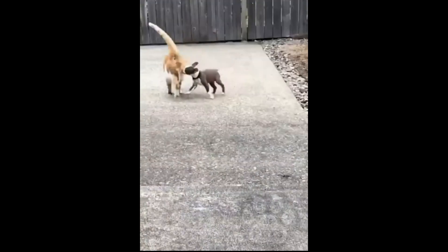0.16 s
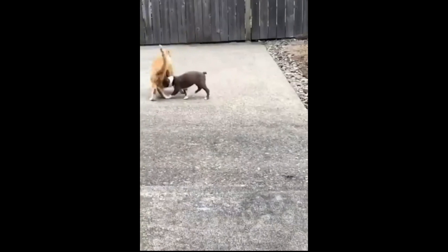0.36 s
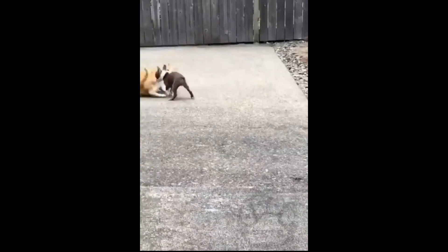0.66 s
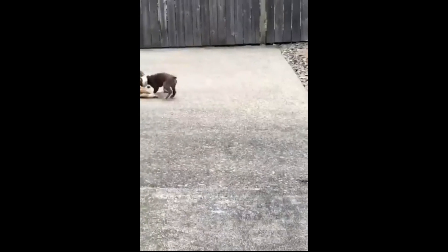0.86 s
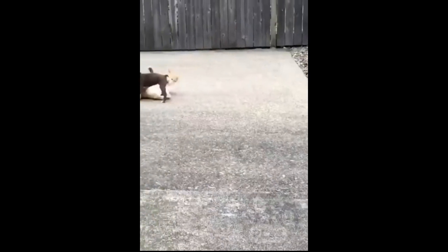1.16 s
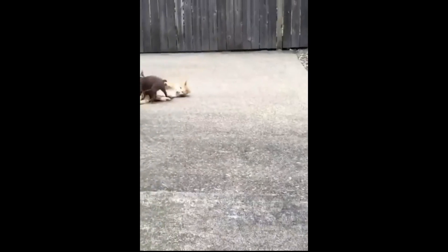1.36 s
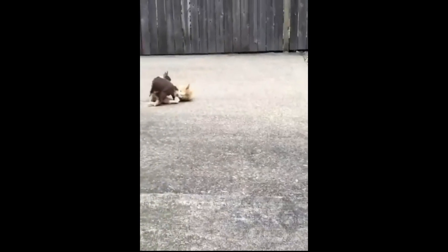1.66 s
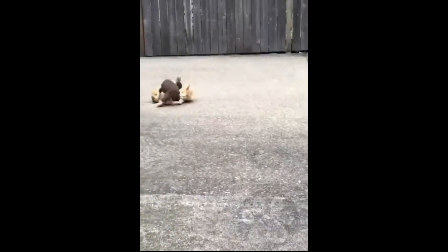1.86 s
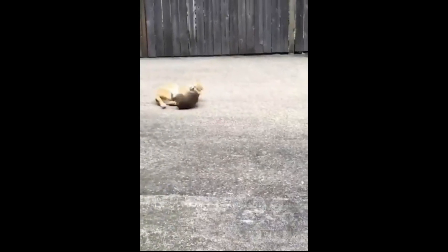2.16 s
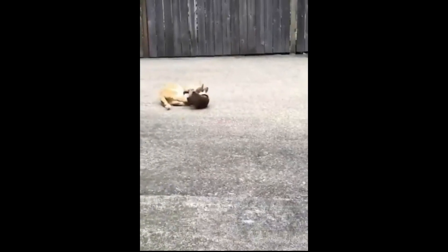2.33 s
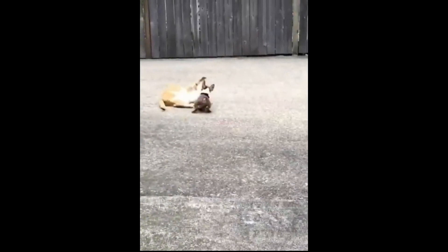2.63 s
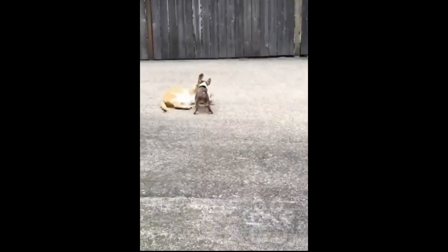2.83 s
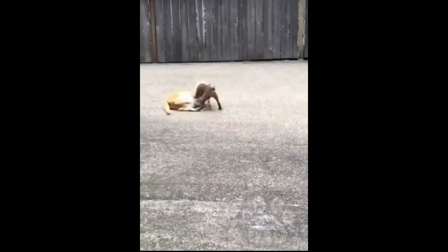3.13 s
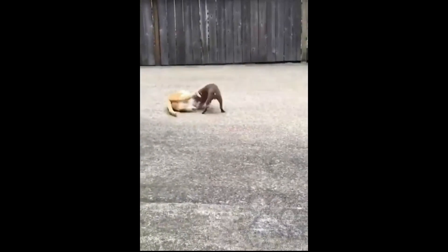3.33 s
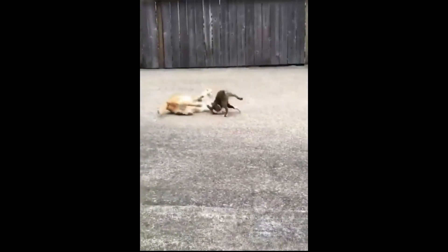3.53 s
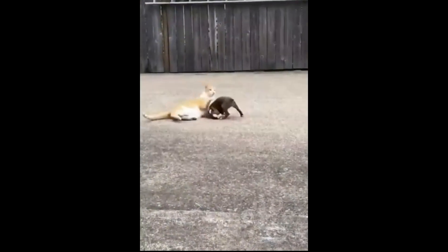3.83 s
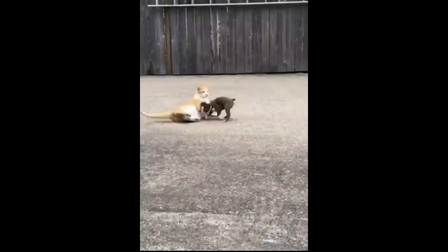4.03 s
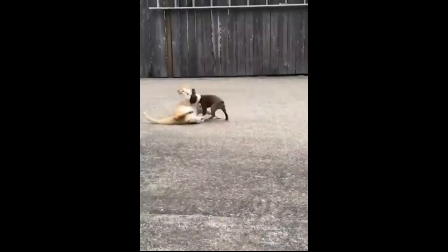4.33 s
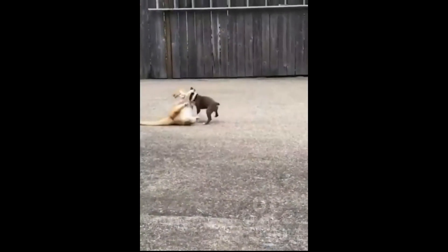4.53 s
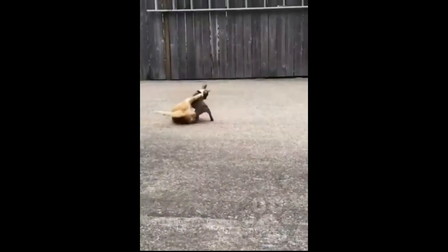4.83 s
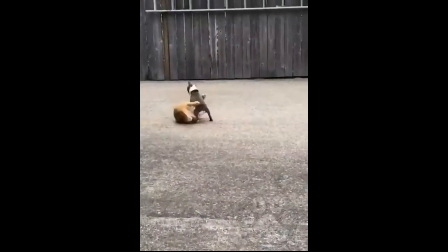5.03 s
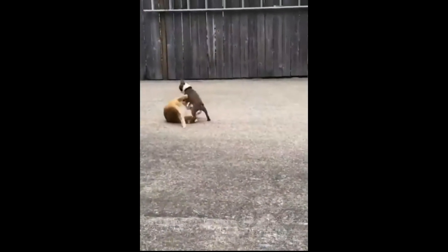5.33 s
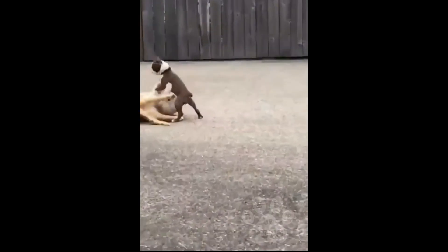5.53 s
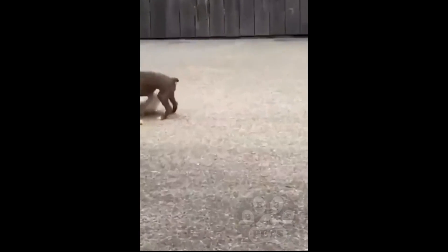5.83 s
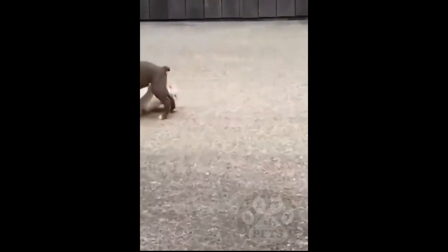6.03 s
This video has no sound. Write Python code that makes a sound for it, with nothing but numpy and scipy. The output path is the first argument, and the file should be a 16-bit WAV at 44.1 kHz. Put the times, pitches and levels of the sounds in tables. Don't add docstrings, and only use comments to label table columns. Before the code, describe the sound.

Two small collar tags clink brightly as a puppy and cat tussle on a concrete driveway. Clusters of thin, high chinks come and go among tiny claw ticks and gritty scuffs. A little past halfway, a very loud double clank rings briefly and is choked off, then lighter muffled jingles follow. Faint town rumble and fan hum stay beneath. Heard from a few metres, with slight fence reflections.

```python
import sys
import numpy as np
from scipy import signal
from scipy.fft import rfft, irfft, next_fast_len
from scipy.io import wavfile
from scipy.ndimage import uniform_filter1d, map_coordinates

SR = 44100
rng = np.random.default_rng(int(sys.argv[2]) if len(sys.argv) > 2 else 0)


def bounce(signal):
    frames = np.transpose(np.atleast_2d(signal))
    limited = np.clip(frames, -1, 1)
    pcm = np.round(limited * 32767).astype(np.int16)
    wavfile.write(sys.argv[1], SR, pcm)


def level_to_linear(level):
    exponent = np.asarray(level, float) / 20
    return 10 ** exponent


N = 272626

# [f/Hz, level/dB]
RUMBLE_SPECTRUM = [(13, -56.5), (24, -27), (56, -2.5), (156, -4.5), (310, -8.5), (395, -15), (480, -27),
                   (1100, -120)]
WASH_SPECTRUM = [(250, -39.5), (450, 1), (800, -2), (1500, -10), (2500, -15), (5000, -17.5), (10000, -23),
                 (16000, -30)]
# [f/Hz, peak level/dB]
FAN_LINES = [(37.1, -61), (75.5, -54), (96, -57), (110.9, -57), (116.8, -57), (120, -52.7), (145.9, -57.5),
             (160.3, -60), (233.5, -52), (320.7, -63), (328, -66), (481.1, -69), (550.1, -67), (637, -66)]
# [t/s, peak level/dB]
WHINE_LEVEL = [(0.05, -64), (.5, -58), (1.25, -58), (1.45, -67), (1.85, -76), (2.6, -64), (3.1, -76),
               (3.7, -63), (4.1, -66), (4.55, -72.5), (4.82, -59.5), (5.5, -59.5), (6.18, -61)]
# [f/Hz, T60/s]
FENCE_DECAY = [(500, .15), (4000, 0.47), (10000, 0.355), (16000, 0.13)]
# [t/s, level/dB]
SCUFF_EFFORT = [(0.0, -84), (0.14, -65.5), (0.28, -66.5), (0.45, -70), (0.9, -67), (1.24, -74.5),
                (2.1, -70), (2.34, -65.5), (2.52, -56), (2.77, -76), (3.3, -70.5), (3.66, -60.5),
                (3.84, -51.5), (4.1, -65), (4.54, -71.5), (5.1, -67), (5.38, -70.5), (6.18, -71)]
# [f/Hz, level/dB]
DULL_GRIT = [(800, -21), (2000, -2), (3500, -3), (6000, 0), (9000, -6.5), (14000, -27)]
BRIGHT_GRIT = [(4000, -35), (7000, 0), (10000, -2.5), (14000, 1.5), (17000, 1)]
# [start t/s, length/s, rms level/dB, centre f/Hz]
SKIDS = [(0.584, 0.08, -56, 4000), (0.599, 0.13, -54, 900), (0.802, 0.21, -54.5, 950),
         (0.655, 0.05, -55, 11100), (0.831, 0.025, -47, 4330), (.93, 0.045, -56, 4000),
         (1.401, 0.044, -52, 4840), (1.86, 0.028, -56.5, 3500), (2.286, 0.059, -58, 3000),
         (2.417, 0.14, -48, 4860), (2.417, 0.093, -51, 1590), (2.644, 0.12, -58.5, 7000),
         (3.11, 0.085, -56.5, 9000), (3.625, 0.1, -53.5, 9000), (3.9, 0.02, -31, 10000),
         (4.041, 0.058, -46, 7940), (4.236, 0.061, -52, 12000), (4.796, 0.023, -55, 6000),
         (5.135, 0.047, -48, 6000), (5.851, 0.054, -59, 8500), (3.954, 0.036, -49, 12000),
         (5.58, 0.052, -55, 9000)]
# [t/s, peak level/dB, centre f/Hz]
CLAW_TICKS = [(0.3455, -28.5, 10000), (0.685, -34, 11300), (0.902, -36, 4120), (1.1618, -35, 11600),
              (1.4118, -30, 5500), (1.5292, -42, 3430), (2.668, -36, 6670), (2.7194, -37.5, 5110),
              (3.1243, -48, 4270), (3.1697, -39, 3200), (3.4154, -41, 5770), (3.4396, -37, 14600),
              (3.5044, -41.5, 7490), (3.711, -36, 5140), (4.1465, -38, 7620), (4.262, -32, 13700),
              (3.975, -38, 13000), (4.329, -31.5, 4700), (4.2459, -36, 12300), (4.2968, -41, 5000),
              (4.803, -41, 2800), (5.0532, -31, 4250), (5.3892, -45, 8200), (0.6637, -38, 9000),
              (0.6732, -37, 11500), (0.6807, -36, 11800), (0.7131, -42, 11800), (4.091, -38, 7000)]
# [t/s, length/s, f/Hz, peak level/dB, bend/Hz]
GLINTS = [(5.65, .16, 3600, -66.5, 0), (.172, 0.052, 10110, -33, -2), (3.888, 0.025, 3400, -44, -110),
          (3.92, 0.028, 3920, -45, -20), (3.87, .05, 4970, -43, 0), (3.96, .04, 3800, -50, 60),
          (3.836, .03, 10130, -31.5, 0), (3.888, .02, 14400, -38, 0), (4.435, .03, 4960, -54, 0),
          (1.068, 0.053, 7630, -45, 0), (2.46, .17, 4968, -42, 0), (2.43, .03, 4968, -46, 0),
          (.17, .1, 4968, -55, 0), (.155, .025, 11150, -43, -2), (2.45, .03, 10110, -33, 0),
          (2.536, .03, 14400, -42, 0), (.165, .04, 14400, -41, 0), (4.436, .035, 14400, -42, 0),
          (5.155, .012, 10110, -42, 0)]
# [t/s, depth level/dB, lowest f/Hz]
THINNINGS = [(.012, -7, 6000), (.03, -7, 3000), (.21, -14, 1500), (1.09, -14, 1500), (1.95, -11, 1500),
             (2.18, -10, 1500), (2.6, -13, 1200), (3.228, -13, 900), (3.74, -16, 1500), (3.897, -14, 1200),
             (4.458, -13, 1000), (5.125, -10, 8000), (5.435, -12, 1500), (5.875, -11, 1500),
             (5.92, -11, 1500), (5.965, -10, 3000)]
# [t/s, peak level/dB, lowest f/Hz]
EDGE_TAPS = [
    (3.7728, -8, 600),
    (3.7852, -12, 600),
    (3.7985, -15, 1900),
    (3.8105, -13, 1200),
    (3.8447, -15.5, 900),
    (3.9106, -10.5, 1200),
    (3.939, -11, 1800),
]
# [t/s, peak level/dB]
FLAT_KNOCKS = [(0.156, -36), (2.4357, -24), (2.4454, -40), (2.5124, -36), (3.7723, -2), (3.7843, -6.5),
               (3.8087, -20), (3.8193, -23), (3.845, -27), (3.9394, -46), (4.0479, -24.5), (4.0744, -33),
               (4.121, -27.5), (5.1328, -29), (5.143, -40)]
# [t/s, click level/dB, ring level/dB, low mode over ring/dB, high modes over ring/dB]
FREE_BLOWS = [(0.145, -30, -43, -33, -2), (0.154, -20, -27.5, -19, -12), (0.1694, -45, -46, -3, -8),
              (0.395, -27, -44, -28, -4), (0.5294, -24, -48, -30, -6), (0.5671, -29, -49, -14, -1),
              (0.5942, -34, -48, -21, -12), (1.0461, -21, -36.5, -20, 3), (1.0658, -31.5, -42, -36, -9),
              (2.384, -37, -43.5, -22, -11), (2.4357, -22, -40, -10, -8), (2.4458, -34, -33.5, -5.5, -13),
              (2.4552, -32, -32, -14, -15), (2.4694, -34, -39, -12, -6), (2.5118, -24, -36, -12, -7),
              (2.5394, -30, -42.5, -21, -3), (3.7722, -2, -16.5, -9.5, -19), (3.8444, -28, -33, -25, -20),
              (3.9214, -40, -47, -4, -5), (4.375, -35, -46, -30, -2.5), (4.4353, -16, -48, -22, -0.5)]
# [t/s, click level/dB, ring level/dB, high modes over ring/dB]
HELD_BLOWS = [(0.2688, -40, -46, -5), (0.291, -40, -48, -3), (0.7257, -42, -53, -8), (0.805, -42, -47, -14),
              (0.858, -31, -44, -11), (1.794, -43.5, -57, -1), (1.8193, -41.5, -46, -15),
              (2.0662, -41.5, -52, -5), (3.3358, -31, -50.5, -2), (3.391, -42, -52, -2),
              (3.4565, -48, -71, 13), (3.512, -16, -42, -7), (3.5236, -19, -42, -7),
              (4.0484, -23.5, -36, -11), (4.121, -17, -37, -13), (4.8895, -37, -54, -1),
              (5.2026, -38, -46.5, 1), (5.5807, -42, -58, -1), (5.6043, -30, -39.5, -8),
              (5.6194, -48, -54, -3), (5.656, -38, -49.5, -14), (5.679, -40, -46, -17),
              (5.87, -48, -50, -12), (6.0394, -47, -78, 11)]
# [t/s, click level/dB, ring level/dB, low mode over ring/dB, high modes over ring/dB]
PINNED_BLOWS = [(0.4179, -24, -34.5, -31, -13), (0.424, -41, -44, -31, -17), (0.837, -40, -44, -18, -16),
                (2.634, -24, -34, -26, -26), (3.907, -20, -36, -14, -4), (5.1318, -30, -36, -12, -20),
                (5.136, -30, -26, -22, -16), (5.143, -26, -30, -20, -15), (5.149, -35, -29, -20, -20),
                (5.154, -18, -27, -28, -19), (5.167, -35, -42, -14, 1), (5.1774, -23, -32.5, -22, -17)]
# [t/s, click level/dB, low mode level/dB, high mode level/dB]
SMALL_BLOWS = [
    (0.1794, -27, -66, -50),
    (0.5544, -35, -68, -54),
    (1.0544, -28, -78, -51),
    (1.0814, -35, -82, -63),
    (2.4364, -16, -50, -58),
    (2.4654, -23, -62, -44),
    (2.5894, -39, -62, -57),
    (3.7754, -12, -44, -32),
    (3.8394, -17, -45, -36),
]
# [f/Hz, split/Hz, T60/s]
TAG_MODES = [(4195, 24, 0.17), (7630, 110, 0.11), (10104, 26.6, 0.13), (14390, 44.4, 0.2)]
SMALL_TAG_MODES = [(4968, 4.6, 0.97), (11170, 9.8, 0.51)]
# [f/Hz, level/dB]
CLINK_SPECTRUM = [(3000, -44), (6000, -17), (8000, 0.5), (12000, -4.5), (16000, -5)]
KNOCK_SPECTRUM = [(400, -46), (1500, -19), (3200, -19), (5200, -1.5), (6500, -4.5), (9000, -35),
                  (14000, -30.5)]
RATTLE_SPECTRUM = [(1500, -20.5), (3500, -4.5), (5500, -7.5), (6800, 5.5), (8500, 1.5), (12000, -7),
                   (16000, -16.5)]
# [f/Hz, peak level/dB, brushed by fur t/s, loss/dB, T60/s]
FLUNG_MODES = [(4193, -19.5, 3.826, 10, 0.47), (4222, -36.5, 3.826, 2, .3), (7620, -7, 3.815, 14, .45),
               (7525, -23, 3.814, 12, .3), (10115, -20.5, 3.808, 10, .3), (14405, -16, 3.791, 9, .3),
               (14372, -28, 3.835, 6, .3), (5970, -42.5, 3.82, 3, .3), (6546, -41.5, 3.82, 3, .4),
               (6860, -38, 3.82, 3, .3), (6950, -34, 3.82, 4, .2), (8872, -46, 3.82, 3, .3),
               (12780, -48, 3.82, 3, .5), (13400, -47, 3.82, 2.5, .4)]
# [f/Hz, peak level/dB]
SQUEEZED_MODES = [(3280, -42), (3960, -30), (4220, -31), (7790, -19.5), (10300, -24), (14400, -20),
                  (15300, -30)]
FLING_S, PINCH_S = 3.7846, 3.9172


def unit(x):
    return x / np.sqrt(np.mean(x ** 2) + 1e-20)


def along(points, hz):
    f, v = np.transpose(points)
    return np.interp(np.log(hz + 1), np.log(f + 1), v)


def curve(rows):
    s, values = np.transpose(rows)
    return np.interp(np.arange(N) / SR, s, values)


def wobble(rate, size=N):
    knots = rng.standard_normal(int(size * rate / SR) + 4)
    return map_coordinates(knots, [np.arange(size) * rate / SR])


def coloured(x, spectrum):
    m = next_fast_len(len(x) + 4096)
    gain = level_to_linear(along(spectrum, np.fft.rfftfreq(m, 1 / SR)))
    return irfft(rfft(x, m) * gain, m)[:len(x)]


def rush(spectrum, patchy_db):
    z = signal.stft(rng.standard_normal(N + 512), nperseg=512)[2]
    field = uniform_filter1d(rng.standard_normal(z.shape), 6, 0)
    field = uniform_filter1d(field, 10, 1)
    noise = signal.istft(z * level_to_linear(patchy_db * unit(field)), nperseg=512)[1][:N]
    return unit(coloured(noise, spectrum))


def add(track, s, piece):
    spot = track[round(s * SR):][:len(piece)]
    spot += piece[:len(spot)]


def town():
    t = np.arange(N) / SR
    fan = np.zeros(N)
    for hz, db in FAN_LINES:
        phase = 2 * np.pi * (hz * t + rng.random()) + 0.24 * wobble(3.01)
        fan += level_to_linear(db + 0.64 * wobble(3.2)) * np.sin(phase)
    for hz in (151.49, 153.63):
        fan += level_to_linear(-51) * np.sin(2 * np.pi * hz * t + 0.2 * wobble(3.3))
    whine_db = curve(WHINE_LEVEL) + 0.8 * wobble(9) + 1.6 * wobble(25)
    whine = level_to_linear(whine_db) * np.sin(2 * np.pi * 1714 * t + 0.4 * wobble(4.5))
    drift_db, opens_s = 0.34, 0.094
    rumble = level_to_linear(-45 + drift_db * wobble(2.69)) * rush(RUMBLE_SPECTRUM, patchy_db=0.84)
    wash_db = -53 + drift_db * wobble(2.51) - 6.2 * np.exp(-t / opens_s * 2)
    wash = level_to_linear(wash_db) * rush(WASH_SPECTRUM, patchy_db=1.93)
    return rumble + wash + fan + whine


def fence(x):
    hz, t, z = signal.stft(rng.standard_normal(SR // 2), SR, nperseg=256)
    decay = level_to_linear(-60 * t / along(FENCE_DECAY, hz)[:, None])
    tail = signal.istft(z * decay, SR, nperseg=256)[1]
    delayed = np.pad(x, (400, 0))
    return signal.fftconvolve(delayed, tail / np.linalg.norm(tail))[:N]


def scuffs():
    effort_db = curve(SCUFF_EFFORT)
    mean_db = effort_db.mean()
    bright_db = mean_db + 0.99 * (effort_db - mean_db)
    grit = level_to_linear(2.63 * wobble(300) + 1.4 * wobble(37))
    dull = level_to_linear(effort_db + 5) * unit(grit * rush(DULL_GRIT, patchy_db=1.0))
    bright = level_to_linear(bright_db + 6) * unit(grit * rush(BRIGHT_GRIT, patchy_db=2.5))
    return dull + bright


def skids():
    sound = np.zeros(N)
    for s, length, db, hz in SKIDS:
        u = np.arange(SR // 4) / SR / max(length / 3, 0.002)
        spectrum = [(hz / 5, -30), (hz * 0.6, -4), (hz, 0), (hz * 1.8, -6), (hz * 4, -20)]
        puff = unit(coloured(rng.standard_normal(len(u)), spectrum))
        add(sound, s, level_to_linear(db) * puff * np.e * u * np.exp(-u))
    return sound * level_to_linear(3 * wobble(330))


def claws():
    t = np.arange(SR // 50) / SR
    lead = 64
    sound = np.zeros(N)
    for s, db, hz in CLAW_TICKS:
        burst = np.pad(level_to_linear(-60 * t / 0.0055) * rng.standard_normal(len(t)), (lead, 0))
        spectrum = [(hz / 3.0, -30), (hz * 0.68, -3), (hz, 0), (hz * 1.13, -6), (hz * 2.2, -22), (hz * 4, -34)]
        tick = coloured(burst, spectrum)
        add(sound, s - lead / SR, level_to_linear(db) * tick / np.abs(tick).max())
    return sound


def glints():
    sound = np.zeros(N)
    for s, length, hz, db, bend_hz in GLINTS:
        t = np.arange(round(length * SR)) / SR
        phase = 2 * np.pi * (hz + bend_hz * t / length / 2) * t + 0.77 * wobble(40, size=len(t))
        swell = np.sin(np.pi * (t / length) ** 0.65)
        add(sound, s, level_to_linear(db + 2.5 * wobble(70, size=len(t))) * swell * np.sin(phase))
    return sound


def thin_treble(x):
    hz, t, z = signal.stft(x, SR, nperseg=256)
    for s, depth_db, low_hz in THINNINGS:
        bands = np.repeat(rng.random(33) > 0.3, 4)[:len(hz)] * (hz > low_hz)
        dip = np.exp(-((t - s) / 0.009) ** 4)
        z *= level_to_linear(depth_db * bands[:, None] * dip)
    return signal.istft(z, SR, nperseg=256)[1][:N]


def taps():
    t = np.arange(SR // 50) / SR
    sound = np.zeros(N)
    impulse = 1.0 * (np.arange(512) == 256)
    for s, db, low_hz in EDGE_TAPS:
        spectrum = [(low_hz * 0.5, -25), (low_hz, 0), (3200, 0), (4500, -12), (8000, -40)]
        add(sound, s - 256 / SR, level_to_linear(db) * coloured(impulse, spectrum))
    for s, db in FLAT_KNOCKS:
        hz = 5200 * (1 + 0.03 * rng.standard_normal())
        add(sound, s + 0.0005, level_to_linear(db - 3.5 - 60 * t / 0.0077) * np.sin(2 * np.pi * hz * t))
    return sound


def struck(rows, top_db):
    blows = []
    for s, click, ring, low, high in rows:
        lean = 0.078 * (low + 22) - top_db / 2
        blows.append((s, click, ring + low, ring, ring + high + lean, ring + high - lean))
    return blows


def rings(hits, modes, lift_db, damping, swing_db, swing_rate, grab_db, first_db, rough, rise):
    t = np.arange(SR // 3) / SR
    all_blows = FREE_BLOWS + HELD_BLOWS + PINNED_BLOWS + SMALL_BLOWS
    times = np.sort([row[0] for row in all_blows] + [FLING_S])
    pressed = 1 + level_to_linear(first_db - 60 * t / 0.014)
    start = pressed * (1 - np.exp(-t / rise))
    sound = np.zeros(N)
    for k, (hz, split_hz, t60) in enumerate(modes):
        mode = np.zeros(N)
        for s, _, *levels_db in hits:
            twin_db, turn, drift = rng.standard_normal(3)
            beat = 1 + level_to_linear(-14.5 + 1.8 * twin_db) * np.cos(2 * np.pi * split_hz * t + 2 * turn)
            tone = np.sin(2 * np.pi * hz * (1 + 0.00186 * drift) * t)
            later = np.maximum(np.searchsorted(times, s + t) - np.searchsorted(times, s + 0.001), 0)
            fade_db = -60 * t * damping / t60 - grab_db * later * hz / 8000
            add(mode, s + 0.00035, level_to_linear(levels_db[k] + lift_db + fade_db) * beat * tone * start)
        swing = level_to_linear(swing_db * np.sqrt(hz / 10000) * wobble(swing_rate))
        chatter = 1 + rough * np.sqrt(hz / 9000) * wobble(450)
        sound += mode * swing * chatter
    return sound


def clicks(hits, column, lift_db, t60, spectrum):
    t = np.arange(SR // 5) / SR
    sound = np.zeros(N)
    for row in hits:
        burst = level_to_linear(row[column] + lift_db - 60 * t / t60) * rng.standard_normal(len(t))
        add(sound, row[0] + 0.0005, burst)
    return coloured(sound, spectrum)


def tags():
    muffled = [(s, click, ring, -19, high) for s, click, ring, high in HELD_BLOWS]
    free = rings(struck(FREE_BLOWS, top_db=0), TAG_MODES, lift_db=1.5, damping=0.79, swing_db=2.5,
                 swing_rate=90, grab_db=3.0, first_db=5.0, rough=0.28, rise=0.00044)
    held = rings(struck(muffled, top_db=-2), TAG_MODES, lift_db=2.0, damping=4.0, swing_db=3.0,
                 swing_rate=70, grab_db=2, first_db=-3.0, rough=0.5, rise=0.00019)
    pinned = rings(struck(PINNED_BLOWS, top_db=-3), TAG_MODES, lift_db=15.5, damping=27.0, swing_db=1.5,
                   swing_rate=93, grab_db=2, first_db=-9, rough=0.27, rise=0.0013)
    small = rings(SMALL_BLOWS, SMALL_TAG_MODES, lift_db=1.0, damping=2.2, swing_db=2.5,
                  swing_rate=30, grab_db=2.0, first_db=-12, rough=0.15, rise=0.0023)
    blows = FREE_BLOWS + HELD_BLOWS + PINNED_BLOWS + [(FLING_S, -6.0, -12.0)]
    clink = clicks(blows, 1, lift_db=-6.0, t60=0.0041, spectrum=CLINK_SPECTRUM)
    knock = clicks(FLAT_KNOCKS, 1, lift_db=4.5, t60=0.0081, spectrum=KNOCK_SPECTRUM)
    rattle = clicks(blows, 2, lift_db=-10.0, t60=0.081, spectrum=RATTLE_SPECTRUM) * level_to_linear(4.9 * wobble(390))
    return free + held + pinned + small + clink + knock + rattle


def flung():
    t = np.arange(SR // 5) / SR
    now = FLING_S + t
    since_pinch = now - PINCH_S

    def chatter(db, rate):
        return level_to_linear(db * wobble(rate, size=len(t)))

    ring = np.zeros(len(t))
    for hz, db, brushed_s, loss_db, t60 in FLUNG_MODES:
        brush_db = loss_db / (1 + np.exp((brushed_s - now) / 0.0025))
        chatter_db = 4.5 * (hz / 14000) ** 2 + np.clip(40 * (now - brushed_s), 0, 3)
        phase = 2 * np.pi * hz * t + 0.3 * hz / 10000 * wobble(110, size=len(t))
        ring += level_to_linear(db - 60 * t / t60 - brush_db) * chatter(chatter_db, 130) * np.sin(phase)
    squeeze = np.zeros(len(t))
    for hz, db in SQUEEZED_MODES:
        squeeze += level_to_linear(db) * chatter(3.1, 500) * np.sin(2 * np.pi * (hz * t + rng.random()))
    swell = np.exp(np.minimum(since_pinch, 0) / 0.002)
    before = 1 / (1 + np.exp(np.clip(since_pinch / 0.00042, -50, 50)))
    remnant = level_to_linear(-19) * (1 - before) * level_to_linear(-60 * np.maximum(since_pinch, 0) / 0.03)
    sound = np.zeros(N)
    add(sound, FLING_S, (ring * (1 - np.exp(-t / 0.0003)) + 2.2 * swell * squeeze) * (before + remnant))
    return sound


def scene():
    near = tags() + flung() + taps() + claws()
    weak = level_to_linear(-13.5) * fence(near) + skids() + glints() + scuffs() + town()
    return (near + thin_treble(weak))[None]


def low_pass(x):
    return signal.sosfilt(signal.butter(12, 16830, fs=SR, output="sos"), x)


def record(dry):
    t = np.arange(N) / SR
    bass = signal.sosfiltfilt(signal.butter(3, 300, fs=SR, output="sos"), dry)
    start = np.clip((t - 0.04) / 0.0093, 0, 1)
    opened = (dry - (1 - start) * bass)[0]
    rounded = opened / (1 + np.abs(opened / 0.97) ** 6) ** (1 / 6)
    top_hz = 15900
    limit = [(top_hz, 0), (top_hz + 100, -40), (top_hz + 900, -44), (top_hz + 1000, -120)]
    limited = coloured(rounded, limit)
    return low_pass(limited[None])


dry = scene()
out = record(dry)
bounce(out)
```